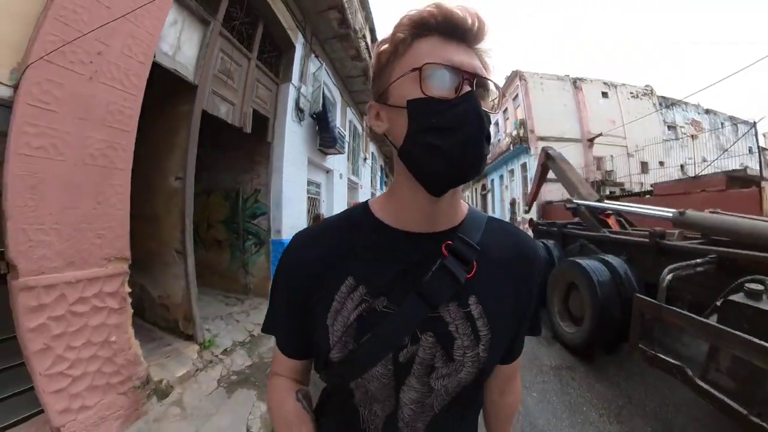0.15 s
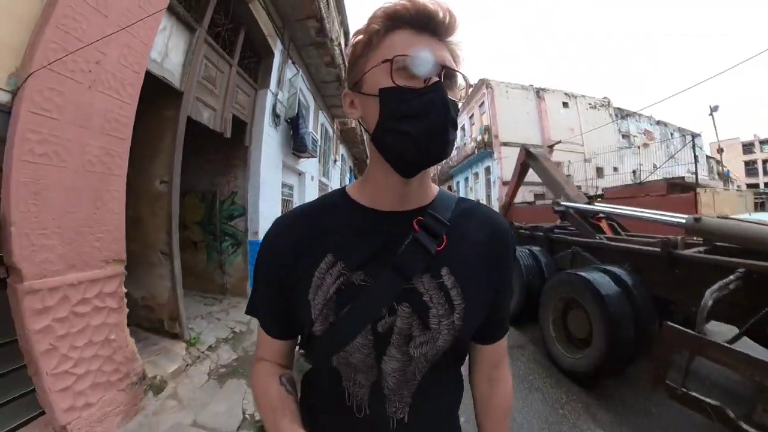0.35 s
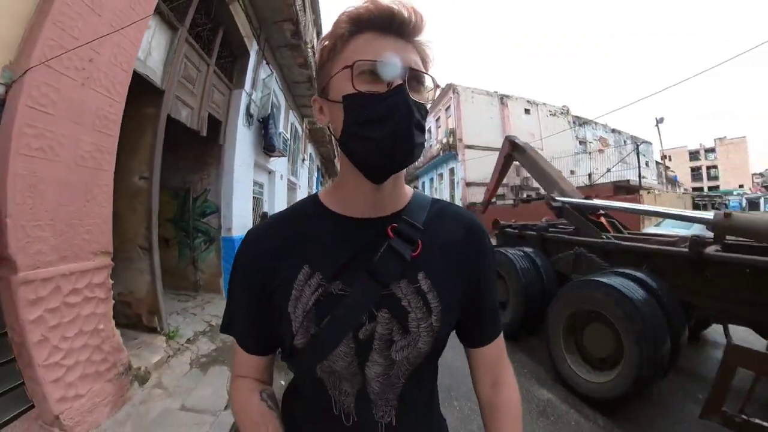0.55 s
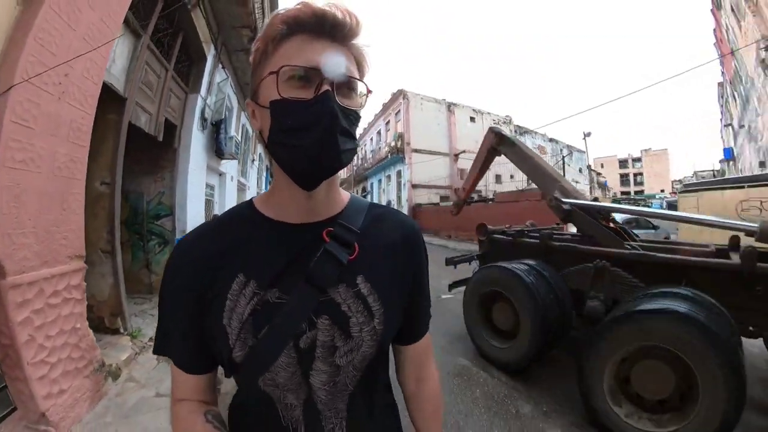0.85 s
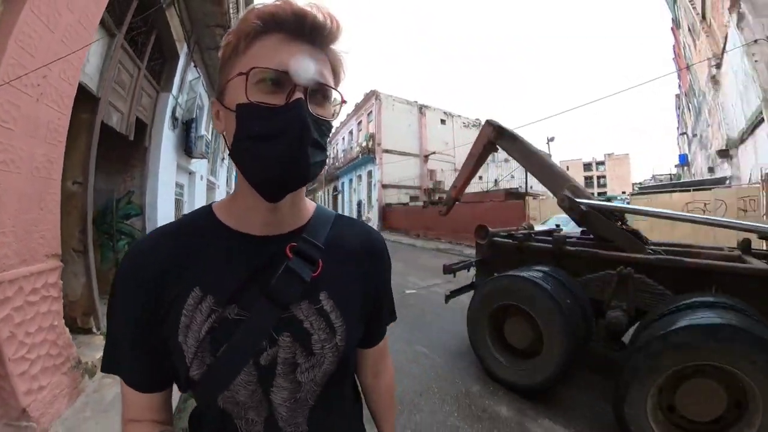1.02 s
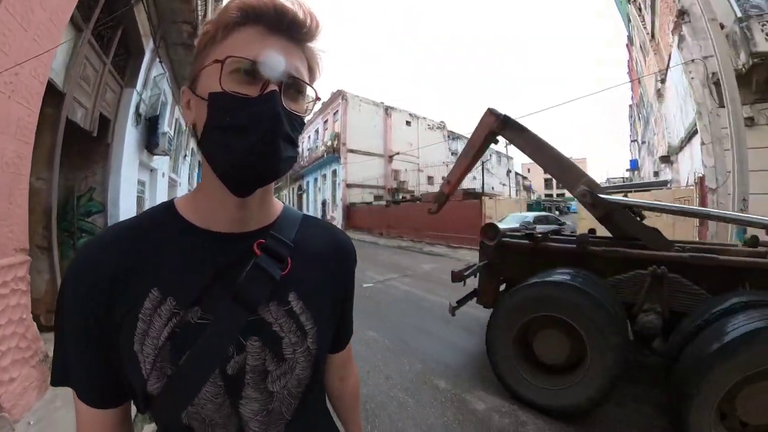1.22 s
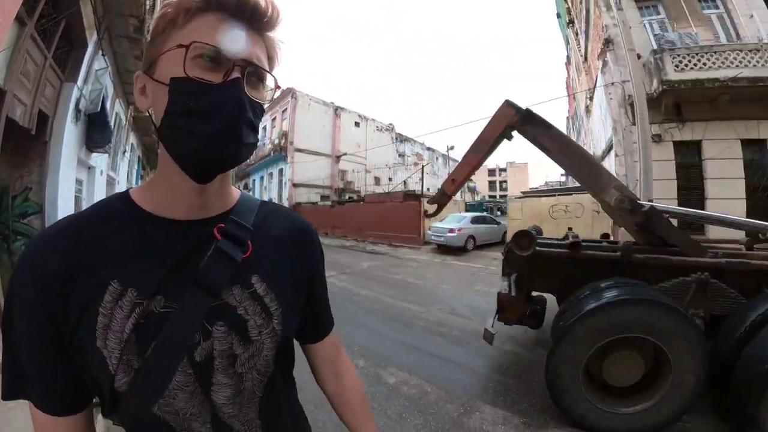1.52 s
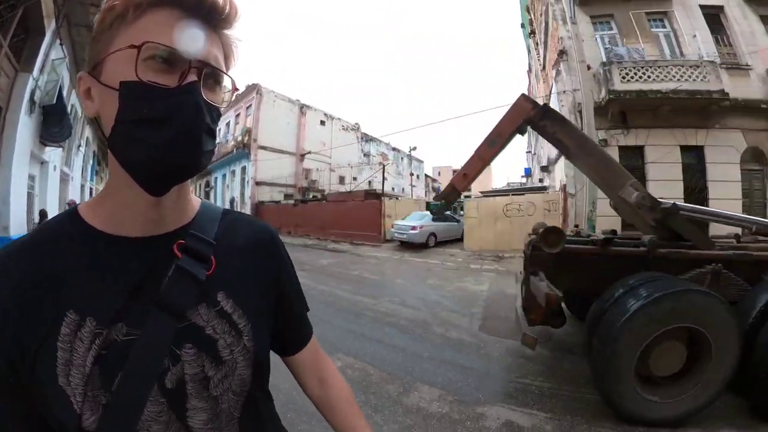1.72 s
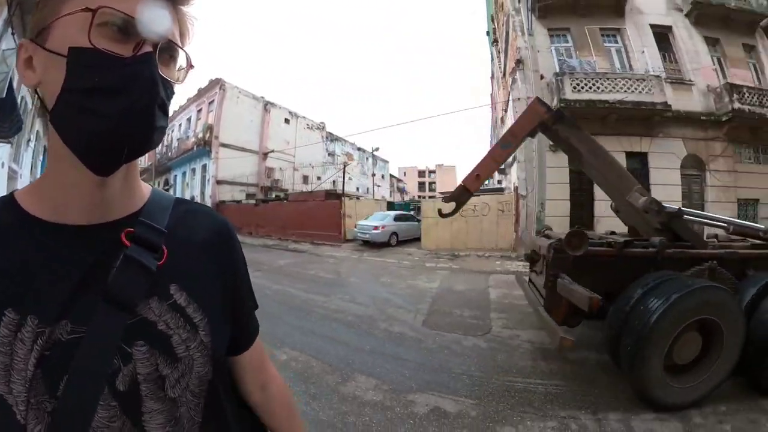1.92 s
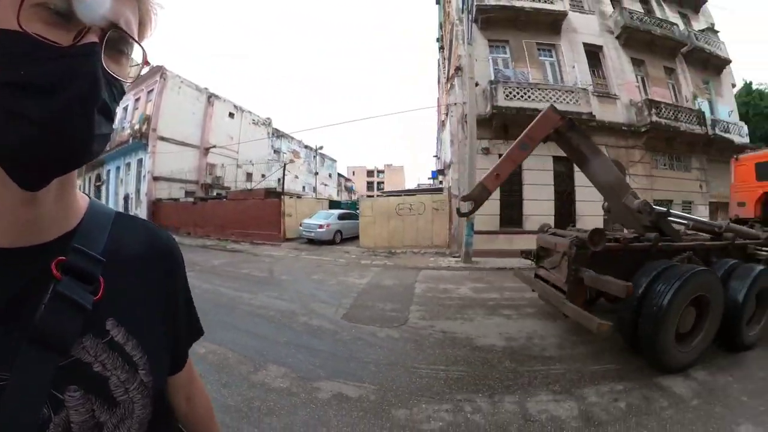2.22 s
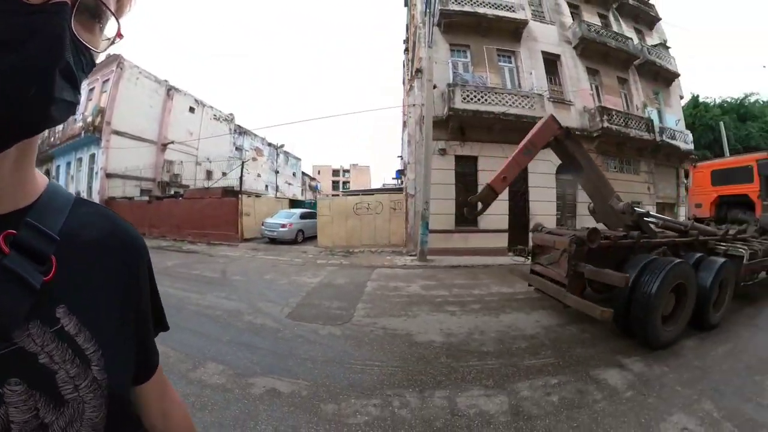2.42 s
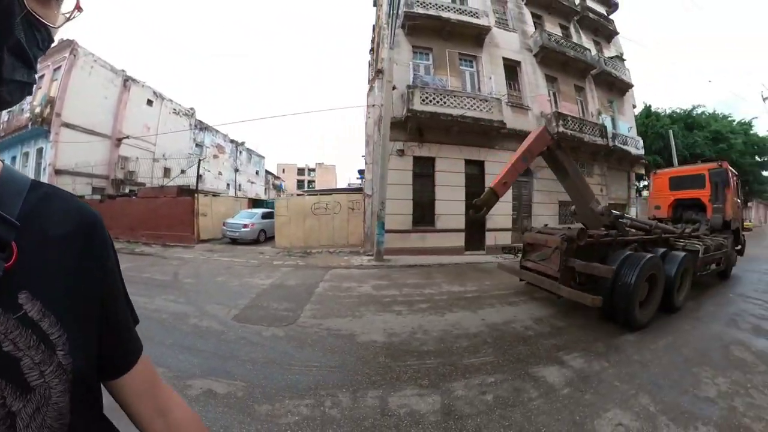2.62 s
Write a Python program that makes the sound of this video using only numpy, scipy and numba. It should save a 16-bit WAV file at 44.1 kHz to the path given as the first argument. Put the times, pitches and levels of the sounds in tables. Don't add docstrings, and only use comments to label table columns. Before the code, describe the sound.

A heavy diesel truck creeps past nearby. From 0 s a steady, uneven low exhaust throb, about 45 firings a second, with hard engine clatter and a faint, slowly falling turbo whistle. Small metal knocks and clinks scatter throughout. Around 1.8 s the boom drops away; by 2.2 s tyre and frame roar swells, with gritty scrub, a rattle, then low bumps to 2.75 s. Short street echoes, muffled treble.

```python
import sys
import numpy as np
from scipy import signal
from scipy.fft import rfft, irfft
from scipy.io import wavfile
from scipy.ndimage import uniform_filter1d
from numba import njit

SR = 44100
rng = np.random.default_rng(int(sys.argv[2]) if len(sys.argv) > 2 else 0)


def voltage_ratio(decibels):
    exponent = np.asarray(decibels, float) / 20
    return 10 ** exponent


def digitize_waveform(pressure):
    field = np.atleast_2d(pressure).T
    bounded = np.clip(field, -1, 1)
    quanta = np.round(bounded * 32767).astype(np.int16)
    wavfile.write(sys.argv[1], SR, quanta)


N = 121275


def level(x, db):
    return x * voltage_ratio(db) / np.sqrt(np.mean(x ** 2))


def curve(table, column):
    rows = np.array(table, float)
    return np.interp(np.arange(N) / SR, rows[:, 0], rows[:, column])


@njit
def svf(x, hz, width_hz):
    y, b, l = np.empty(len(x)), 0., 0.
    for i in range(len(x)):
        g = np.tan(np.pi * hz[i] / SR)
        k = width_hz[i] / hz[i]
        v = (b + g * (x[i] - l)) / (1 + g * (g + k))
        b, l, y[i] = 2 * v - b, l + 2 * g * v, k * v
    return y


def band(x, hz, width_hz):
    return svf(x, hz * np.ones(len(x)), width_hz * np.ones(len(x)))


def twice(x, hz, width_hz):
    return band(band(x, hz, width_hz), hz, width_hz)


def walk(rate_hz):
    k = int(SR / rate_hz)
    held = np.repeat(rng.standard_normal(N // k + 1), k)
    return 1.32 * uniform_filter1d(uniform_filter1d(held, k), k)[:N]


# start_s, cycle_hz
CYCLE = [(0, 7.52), (.6, 7.437), (1.2, 7.369), (1.8, 7.315), (2.75, 7.2)]
CYLINDER_DB = [0, -3.2, -1.25, 1.9, -1.1, .1]
HEADER_LAG_MS = [0, -.3, -.4, -.5, -.35, -.7]


def crank():
    start_cycles, scatter_db, jitter_ms = .633, .5, .1
    firing = 6 * (start_cycles + np.cumsum(curve(CYCLE, 1)) / SR)
    number = firing.astype(int)
    chance = rng.standard_normal((200, 2))
    at = np.flatnonzero(np.diff(number)) + 1
    cylinder = number[at] % 6
    late_ms = np.array(HEADER_LAG_MS)[cylinder] + jitter_ms * chance[number[at], 1]
    late = (late_ms * SR / 1000).astype(int)
    pulse_db = np.array(CYLINDER_DB)[cylinder] + scatter_db * chance[number[at], 0]
    pulses = np.zeros(N)
    pulses[np.clip(at + late, 0, N - 1)] = voltage_ratio(pulse_db)
    return pulses * SR / (2 * CYCLE[0][1]), firing % 1, number


# start_s, low_db, middle_db, upper_db, side_db
EXHAUST = [(0, -27, -18, -34, -25), (.3, -27, -15, -28, -25), (.6, -26, -15.5, -24, -28),
           (.95, -26, -17, -22, -38), (1.2, -26, -17.5, -18, -38), (1.45, -29, -19, -14, -38),
           (1.62, -34, -22, -14, -34), (1.77, -33, -22, -13, -34), (1.84, -44, -34, -28, -40),
           (2.3, -46, -32, -27, -40), (2.5, -46, -28, -24, -40), (2.75, -46, -28, -24, -40)]
# pitch_hz, width_hz
NOTES = [
    (86.4, 30),
    (101.4, 12),
    (105.5, 11),
    (97.5, 6),
]
# pitch_hz, width_hz, level_db
PIPE = [(43.8, 8, -11), (147.5, 7, -12), (250, 10, -21), (295, 10, -26)]
NULLS = [(18, .7), (24, .92), (30, .85), (36, .7)]


def exhaust(pulses):
    lead = int(3 * SR / 7.49)
    running = np.concatenate([pulses[:lead], pulses])
    boom = np.zeros(N)
    for k, (hz, width_hz) in enumerate(NOTES):
        boom = boom + voltage_ratio(curve(EXHAUST, k + 1)) * twice(running, hz, width_hz)[lead:]
    for hz, width_hz, db in PIPE:
        boom = boom + voltage_ratio(-24.5) * level(twice(running, hz, width_hz)[lead:], db)
    for order, share in NULLS:
        boom = boom - share * band(boom, order * curve(CYCLE, 1), 14)
    return boom


# pitch_hz, width_hz, level_db
BLOCK = [(453, 180, 8.5), (698, 120, 5), (1098, 120, 4.5), (1890, 740, 1.5), (3760, 900, -12),
         (4900, 1000, -17)]


def clatter(phase, number):
    decay_firings, scatter_db, lilt_db, lilt_lag_firings = 1.5, 1.8, 1.5, .63
    lilt = lilt_db * np.cos(2 * np.pi * (number - lilt_lag_firings) / 3)
    size = voltage_ratio(scatter_db * rng.standard_normal(200)[number] + lilt)
    gate = uniform_filter1d(size * np.exp(-phase / decay_firings), size=150)
    knock = np.zeros(N)
    for hz, width_hz, db in BLOCK:
        knock = knock + voltage_ratio(db) * level(band(gate * rng.standard_normal(N), hz, width_hz), 0)
    return level(knock, -8) * voltage_ratio(curve(ROAR, 1))


# start_s, level_db, brightness_db_per_octave, midrange_db
ROAR = [(0, -23, 0.5, -0.5), (.22, -26, 0, 1.5), (.42, -24.5, 0, 2.5), (.62, -27, 0.5, 1),
        (.9, -25, -1, -2), (1.2, -27.5, -0.5, 1.5), (1.5, -26.5, 1, 5), (1.75, -26, 0, 4.5),
        (1.9, -24.5, 1, 6.5), (2.1, -23, 1, 5), (2.25, -21.5, 0.5, 3), (2.45, -22.5, 1, 3.5),
        (2.62, -23.5, -1, 5.5), (2.75, -23, -.5, 0.5)]
# pitch_hz, density_db_per_hz
ROAR_COLOUR = [(15, -38), (25, 1), (102, 1.5), (664, -8.5), (2400, -25.5), (3910, -27.5), (4630, -29),
               (7720, -34.5), (8300, -68.5), (10800, -84), (18300, -120)]


def roar():
    mid_hz, mid_octaves, swell_db, flicker_db = 300, 1, .57, 1.4
    colour, swell, out = np.array(ROAR_COLOUR), walk(2.0), 0
    for hz in 25 * 2 ** (np.arange(26) / 3):
        db = np.interp(np.log(hz), np.log(colour[:, 0]), colour[:, 1]) + 10 * np.log10(hz)
        midrange = np.exp(-(np.log2(hz / mid_hz) / mid_octaves) ** 2)
        moved_db = curve(ROAR, 2) * np.log2(hz / 500) + curve(ROAR, 3) * midrange
        noise = twice(rng.standard_normal(N), hz, hz * .36)
        out = out + level(noise, db) * voltage_ratio(moved_db + swell_db * swell + flicker_db * walk(8.97))
    return level(out, 0) * voltage_ratio(curve(ROAR, 1))


# start_s, pitch_hz, width_hz
TURBO = [(0, 4960, 90), (.35, 4850, 110), (.75, 4765, 100), (1.05, 4670, 90), (1.35, 4590, 70),
         (1.5, 4558, 65), (1.85, 4548, 65), (2.2, 4530, 100), (2.6, 4505, 90), (2.75, 4488, 80)]
# start_s, level_db
TURBO_DB = [(0, -50.5), (.45, -49), (.9, -49), (1.2, -51.5), (1.4, -46.5), (1.55, -46), (1.75, -46.5),
            (2.1, -44), (2.6, -41.5), (2.75, -45)]


def turbo():
    halo_db, halo_width_hz, flutter_db = -5, 300, 1.6
    hz, width_hz = curve(TURBO, 1), curve(TURBO, 2)
    core = twice(rng.standard_normal(N), hz, width_hz) / np.sqrt(width_hz)
    halo = twice(rng.standard_normal(N), hz, halo_width_hz)
    whistle = level(core, 0) + level(halo, halo_db)
    return whistle * voltage_ratio(curve(TURBO_DB, 1) + flutter_db * walk(30))


# start_s, level_db, pitch_hz, width_hz, decay_s
RATTLES = [(0.039, -39.5, 2200, 2500, .03), (.11, -42.5, 3550, 358, 0.0086), (.33, -43.5, 3730, 400, .03),
           (.37, -38, 2200, 900, 0.013), (.445, -38, 3610, 300, 0.012), (.45, -38.5, 2200, 910, 0.029),
           (.6, -41, 2020, 500, .02), (.74, -42.5, 3480, 200, 0.014), (.82, -42.5, 4030, 250, .015),
           (.9, -41, 2224, 900, .015), (.91, -44.5, 4230, 148.4, 0.016), (0.971, -38, 2530, 3070, 0.012),
           (1.52, -42, 3000, 1486, .02), (1.66, -33.5, 3020, 3000, .0096), (1.999, -39.5, 3880, 1510, .015),
           (2.1, -39.5, 3940, 500, .02), (2.15, -33.5, 3610, 900, .014), (2.2, -39, 3300, 900, .015),
           (2.33, -40.5, 3630, 500, .02), (2.2, -31, 673, 500, .3), (.7, -36, 1197, 300, .06)]
CLINK_HZ = [2100, 3100, 3600, 4100]


def rattles():
    clink_db, clink_spread_db, clink_t60_s, clink_rise_s = -52, 10, .06, .0012
    t, out = np.arange(N) / SR, 0
    for s, db, hz, width_hz, decay_s in RATTLES:
        shape = np.exp(-np.abs(t - s) / np.where(t > s, decay_s, decay_s * .78))
        out = out + shape * level(twice(rng.standard_normal(N), hz, width_hz), db)
    for place, part, size in rng.random(size=(70, 3)):
        hz = CLINK_HZ[int(part * 4)] * (.96 + .08 * size)
        age_s = np.clip(t - place * N / SR, 0, 1)
        shape = 1000. ** (-age_s / clink_t60_s) * np.minimum(age_s / clink_rise_s, 1)
        out = out + voltage_ratio(clink_db + clink_spread_db * size) * np.sin(2 * np.pi * hz * age_s) * shape
    return out


# peak_s, level_db, pitch_hz, decay_s
RINGS = [(.04, -29, 1116, 0.011), (.19, -27, 191, 0.052), (.225, -23, 262, 0.017), (.345, -27, 254, 0.026),
         (.44, -31.5, 1100, 0.016), (.58, -25.5, 257, 0.028), (.81, -36, 1080, .015),
         (.83, -31.5, 1347, 0.0089), (.97, -32, 1146, 0.011), (1.02, -26, 171.5, 0.055),
         (1.17, -33, 1275, 0.012), (1.39, -28.5, 285, 0.026), (1.45, -24.5, 255, 0.046),
         (1.56, -26, 313, 0.027), (1.68, -23.5, 253, 0.024), (1.9, -30, 282, 0.084), (2.19, -36, 1076, .02),
         (2.26, -26, 465, 0.024), (2.295, -22.5, 112, 0.016), (2.36, -24.5, 336, .025),
         (2.43, -17, 110, 0.012), (2.49, -25, 130, 0.018), (2.56, -22, 104, 0.042), (2.63, -21, 122, .02),
         (2.685, -21, 77, 0.014), (2.68, -28, 477, 0.027), (2.74, -23, 123, .015)]


def rings():
    t, out = np.arange(N) / SR, 0
    for s, db, hz, decay_s in RINGS:
        shape = np.exp(-((t - s) / np.where(t > s, decay_s, decay_s * .62)) ** 2)
        out = out + voltage_ratio(db) * np.sqrt(2) * shape * np.cos(2 * np.pi * hz * (t - s))
    return out


def scrub():
    peak_s, length_s, level_db, centre_hz, width_hz, grain_db = 2.22, .2, -43.5, 3310, 2200, 1
    shape = np.exp(-((np.arange(N) / SR - peak_s) / length_s) ** 2)
    part_hz = width_hz / 4
    grit = np.zeros(N)
    for k in range(-2, 3):
        grain = voltage_ratio(grain_db * walk(60))
        grit = grit + grain * twice(rng.standard_normal(N), centre_hz + k * part_hz, part_hz)
    return shape * level(grit, level_db)


WALL_S = [.013, .029, .047]


def scene():
    pulses, phase, number = crank()
    bright = clatter(phase, number) + turbo() + rattles() + scrub()
    echoes = sum(np.pad(bright, (int(s * SR), 0))[:N] for s in WALL_S)
    truck = exhaust(pulses) + roar() + rings() + bright + voltage_ratio(-11) * echoes
    return np.tile(truck, (2, 1))


# low_hz, high_hz, share_of_time_kept
EDGE_BANDS = [(7850, 8100, .85), (8100, 8350, .5), (8350, 8800, .15)]


def ragged_top(mono):
    hz, spectrum = np.fft.rfftfreq(N, 1 / SR), rfft(mono)
    draw = np.repeat(rng.random(100), 2048)[:N]
    for lo, hi, kept in EDGE_BANDS:
        part = irfft(spectrum * ((hz >= lo) & (hz < hi)), N)
        mono = mono - uniform_filter1d(1. * (draw > kept), size=700) * part
    return mono


WIDE_MOMENTS_S = [.27, 1.85, 2.53]
WIDE_MOMENT_DB = [-30, -19, -20]


def widen(mono):
    lo_hz, hi_hz, top_hz, share = 3050, 6200, 7200, .38
    chance_on, top_chance_on, patch = .78, .1, int(.046 * SR)
    hz, side = np.fft.rfftfreq(N, 1 / SR), 0
    edges = np.arange(lo_hz, top_hz, (hi_hz - lo_hz) / 11)
    spectrum, fresh = rfft(mono), rfft(rng.standard_normal(N))
    for lo, hi in zip(edges[:-1], edges[1:]):
        inside = (hz >= lo) & (hz < hi)
        part, noise = irfft(spectrum * inside, N), irfft(fresh * inside, N)
        chance = chance_on if lo < hi_hz - 1 else top_chance_on
        on = np.repeat(rng.random(100) < chance, patch)[:N]
        on = on & (np.abs(curve(TURBO, 1) - (lo + hi) / 2) > (hi - lo) / 2)
        power = uniform_filter1d(part ** 2, size=1500) + 1e-14
        side = side + uniform_filter1d(1. * on, size=800) * noise * np.sqrt(power / np.mean(noise ** 2))
    moments = np.zeros(N)
    for s, db in zip(WIDE_MOMENTS_S, WIDE_MOMENT_DB):
        moments = moments + voltage_ratio(db) * np.exp(-((np.arange(N) / SR - s) / .014) ** 4)
    return 1.5 * share * side + moments * np.roll(mono, shift=9001)


def roll_off(x):
    return signal.sosfilt(signal.butter(12, 8450, fs=SR, output="sos"), x)


def record(dry):
    lead = 4096
    mono = np.pad(dry[0], (lead, 0), mode="reflect")
    for order, hz, kind in [(8, 8400, "low"), (4, 8560, "low"), (4, 33, "high")]:
        mono = signal.sosfilt(signal.butter(order, hz, kind, fs=SR, output="sos"), mono)
    mono = ragged_top(mono[lead:])
    side = widen(mono)
    return roll_off(np.array([mono + side, mono - side]))


dry = scene()
out = record(dry)
digitize_waveform(out)
```